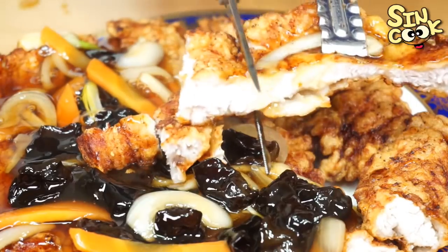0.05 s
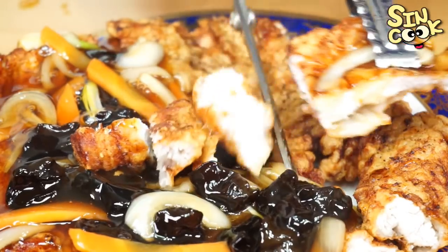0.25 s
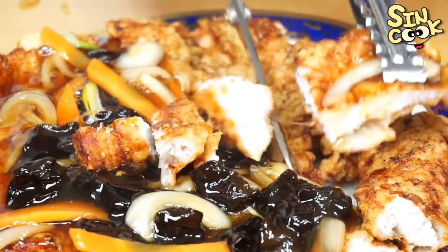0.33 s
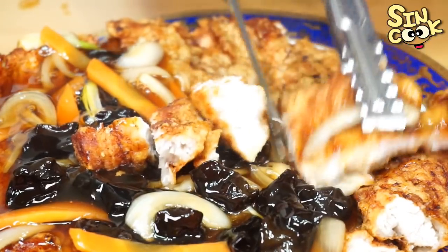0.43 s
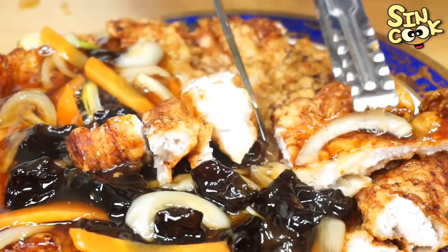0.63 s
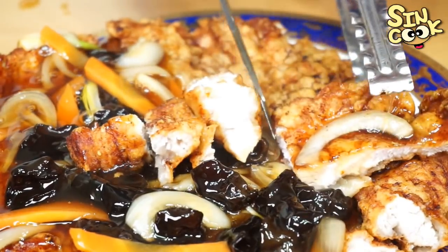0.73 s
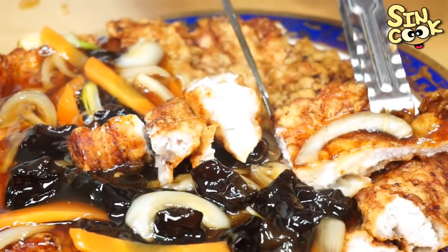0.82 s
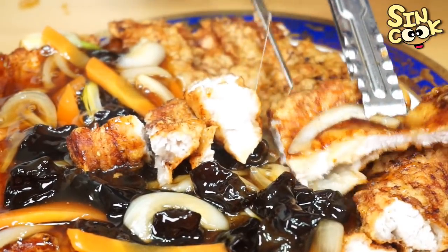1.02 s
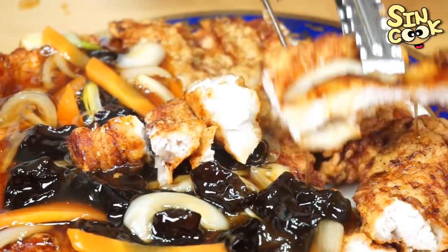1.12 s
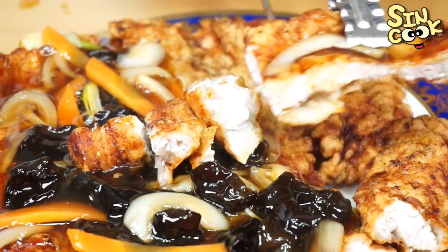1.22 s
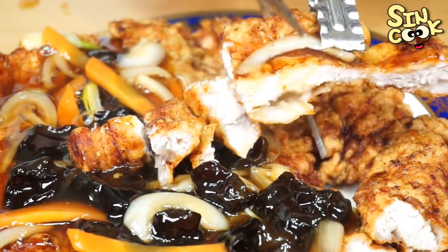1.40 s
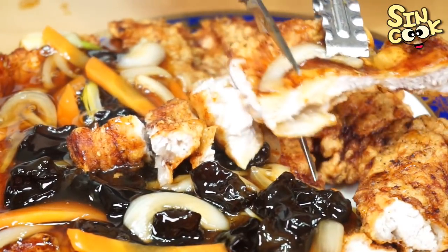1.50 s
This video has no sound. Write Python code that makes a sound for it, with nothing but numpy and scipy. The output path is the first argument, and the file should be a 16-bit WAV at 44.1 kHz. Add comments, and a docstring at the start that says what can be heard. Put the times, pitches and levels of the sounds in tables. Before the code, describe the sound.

Close up in a small room, scissors cut crispy, saucy fried meat, ending in one sharp metallic snip. Quieter crust crackles, a thin steel scrape and light clicks of tongs follow over faint ventilation.

```python
"""Kitchen scissors cut a crisp fried cutlet over a plate, close to a stereo microphone in a small room.
The crust crackles in tiny fractures, with wet pops of sauce, until the blades snap shut.
Tongs then press and pick up the meat, clicking, and steel rubs on steel with a thin ring.
Underneath lie the rush of ventilation, a faint hum and a low rumble of handling."""
import sys
import numpy as np
from scipy import signal
from scipy.fft import rfft, irfft
from scipy.io import wavfile
from scipy.ndimage import uniform_filter1d, minimum_filter1d

SR = 44100
rng = np.random.default_rng(int(sys.argv[2]) if len(sys.argv) > 2 else 0)


def unload_audio(sound):
    """Save the sound as a 16-bit wav file, at the path given as the first command line argument."""
    columns = np.transpose(np.atleast_2d(sound))
    # keep every value between -1 and 1, then stretch to whole-number steps
    steps = np.round(np.clip(columns, -1, 1) * 32767)
    wavfile.write(sys.argv[1], SR, steps.astype(np.int16))


N = 68355
TIME = np.arange(N) / SR

# crunch of the cut: t/s, dull body level/dB, crisp treble level/dB
CUT_LEVELS = [(0, -54.5, -52), (.03, -61, -64.5), (0.069, -58, -56.5), (.12, -57.5, -51.5),
              (.165, -56, -52), (.195, -50.5, -49.5), (.215, -47, -45), (0.254, -55.5, -45),
              (0.267, -44.5, -43), (.279, -41, -45), (.29, -87, -90)]
# crust squeezed or dragged: peak t/s, rise/s, fall/s, body level/dB, treble level/dB
CRUST_SQUEEZES = [(0.057, 0.0064, .016, -43, -56), (0.499, 0.056, 0.1, -55.5, -57.5),
                  (0.548, 0.032, 0.046, -48, -50), (.60, 0.046, 0.17, -58, -60),
                  (0.934, 0.048, 0.03, -55, -59.5), (0.958, 0.0075, 0.011, -49, -49),
                  (0.977, 0.011, 0.019, -48.5, -41.5), (1.024, 0.046, 0.033, -51.5, -49.5),
                  (1.09, 0.09, 0.072, -54, -51.5), (1.482, 0.019, 0.013, -59.5, -65.5),
                  (1.509, 0.0085, 0.063, -55.5, -49)]
# single cracks of crust and ticks of the tools: t/s, body level/dB, treble level/dB
CRACK_EVENTS = [(0.038, -68, -47), (0.055, -59, -41), (0.1064, -50, -62), (0.1342, -49.5, -46),
                (.139, -47.5, -44.5), (0.1751, -39.5, -44.5), (0.1815, -55, -67), (0.2002, -42, -37),
                (0.202, -51, -46), (0.2418, -77, -48), (0.577, -55, -50.5), (0.740, -52.5, -71),
                (0.944, -60, -52), (1.0988, -60, -40.5), (1.5047, -55, -48), (1.523, -58, -50),
                (1.541, -59, -51.5)]
# spectra of the crunch's dull body and crisp treble: f/Hz, level/dB
BODY_SPECTRUM = [(250, -29), (700, -11), (1100, -12), (1500, -5), (2000, -5), (2600, -2), (3200, -4),
                 (4200, -11.5), (6000, -21), (12000, -34)]
CRISP_SPECTRUM = [(2000, -39), (4200, -9.5), (5600, -10), (7400, -5), (8800, -2), (10400, -1), (12500, 1.5),
                  (14000, -2), (15700, -11.5)]
CRUNCH_PAN_DB, CRUNCH_WIDTH = -3, 0.44

# spectrum of the ventilation: f/Hz, level/dB
AIR_SPECTRUM = [(25, -22), (50, -11.5), (90, -8), (140, 0), (220, -1), (300, -3), (400, 0.5), (600, -2),
                (800, -5), (1300, -11.5), (1530, -5), (1800, -15), (4500, -19), (10000, -22),
                (15500, -25.5)]
# how alike the ventilation is in the two channels: f/Hz, correlation
AIR_LIKENESS = [(30, 0.76), (125, 0.92), (300, 0.58), (700, 0.33), (2000, 0.22), (12000, 0.2)]
# tones of the hum: f/Hz, level/dB
HUM_TONES = [(523.6, -63), (697.5, -73)]
# course of the handling rumble: t/s, level/dB
RUMBLE_LEVELS = [(0, -91), (.25, -64.5), (.45, -77.5), (.9, -78), (1.03, -57.5), (1.12, -67), (1.25, -60.5),
                 (1.55, -71.5)]
# its spectrum: f/Hz, level/dB
RUMBLE_SPECTRUM = [(20, -11.5), (50, -2.5), (90, -11.5), (220, 1.5), (400, -9.5), (3000, -61)]

# the blades shut and bounce twice: t/s, level/dB
BLADE_HITS = [(0.2796, 3), (.27989, -8.5), (0.2815, -11)]
# modes of the closing scissors: f/Hz, level/dB
SCISSOR_MODES = [(1150, -18), (2700, -13), (3420, -4.5), (3850, -10), (7450, -15), (8400, -12), (8950, -8),
                 (10150, -9.5), (11000, -10.5), (12300, -14), (15000, -20)]
# spectrum of the snap as it spreads into the room: f/Hz, level/dB
SNAP_ROOM_SPECTRUM = [(400, -23), (750, -15.5), (1050, -2), (1600, -6.5), (2400, 3), (3400, 0.5),
                      (5000, -9), (7000, -11.5), (10300, -7), (13000, -18), (15500, -13.5)]

# tongs drag through the crust: peak t/s, rise/s, fall/s, level/dB
TONG_DRAGS = [(0.545, 0.023, 0.026, -42.5), (1.094, 0.037, 0.039, -51)]
# tongs click against steel: t/s, level/dB
TONG_CLICKS = [(0.9725, -36), (1.0132, -29.5), (1.0185, -49)]
# modes of the gripped tongs: f/Hz, level/dB, T60/s
TONG_MODES = [(1970, -5, 0.0062), (2490, -0.5, 0.015), (2854, 1, 0.0079), (7020, 5, 0.0035),
              (10660, 3.5, 0.0066), (12030, 0, 0.0056), (13700, 4, 0.0034)]
# steel slides on steel: peak t/s, rise/s, fall/s, level/dB
STEEL_RUBS = [(0.688, 0.03, 0.022, -52), (0.71, .02, 0.026, -54), (0.732, 0.025, 0.034, -48),
              (0.79, 0.065, 0.033, -59), (0.869, 0.023, 0.054, -56), (0.901, 0.019, 0.01, -58)]
# modes of the sliding steel: f/Hz, level/dB, T60/s
STEEL_MODES = [(1870, -11, 0.28), (6880, -9, 0.025), (8710, -6.5, 0.027), (10190, 3.5, 0.03),
               (11500, -6, .032), (12540, -3, 0.032), (13100, -8, .032), (13650, -10, 0.032)]


def from_db(db):
    """Decibels to gain."""
    return 10 ** (np.asarray(db) / 20)


def rms_one(x):
    """Scale to unit power."""
    return x / np.sqrt(np.mean(x ** 2) + 1e-20)


def at_hz(points, hz):
    """Read a table on a log-frequency axis."""
    f, v = np.transpose(points)
    return np.interp(np.log(hz + 1e-6), np.log(f), v)


def pan(db):
    """Channel gains for a level difference, left minus right."""
    return from_db(np.array([[.5], [-.5]]) * db)


def decay(t60, size=N):
    """Gain that falls 60 dB in t60 seconds."""
    return from_db(-60 * TIME[:size] / t60)


def filtered(x, hz, kind="low", order=2):
    """Low-pass or high-pass a sound."""
    return signal.sosfilt(signal.butter(order, hz, kind, fs=SR, output="sos"), x)


def through(x, response):
    """Pass a sound through an impulse response."""
    return signal.fftconvolve(np.atleast_2d(x), np.atleast_2d(response), axes=1)[:, :N]


def colour(points, size=8192):
    """Causal impulse response of unit energy with the given spectral shape."""
    magnitude = from_db(at_hz(points, np.fft.rfftfreq(size, 1 / SR)))
    cepstrum = irfft(np.log(magnitude))
    cepstrum[1:size // 2] *= 2
    cepstrum[size // 2 + 1:] = 0
    response = irfft(np.exp(rfft(cepstrum)))
    return response / np.linalg.norm(response)


def ring(x, hz, t60):
    """One damped mode: a unit click sets a sine of height 1 ringing."""
    r, w = from_db(-60 / (t60 * SR)), 2 * np.pi * hz / SR
    return signal.lfilter([0, np.sin(w)], [1, -2 * r * np.cos(w), r * r], x + 1e-18)


def swells(rows):
    """Gain of swells added in power; each rise and fall time spans 20 dB."""
    return np.sqrt(sum(from_db(db - 20 * np.maximum((peak - TIME) / rise, (TIME - peak) / fall)) ** 2
                       for peak, rise, fall, db in rows))


def grains(per_s=4500, spread_db=5):
    """Tiny clicks of uneven size, each at its own place between left and right."""
    sizes = from_db(spread_db * np.minimum(rng.exponential(1, N), 4)) * rng.choice([-1, 1], N)
    clicks = sizes * (rng.random(N) < per_s / SR)
    return rms_one(clicks * (1 + CRUNCH_WIDTH * rng.standard_normal(N) * [[1], [-1]]))


def sauce_pops(per_s=54):
    """Sparse wet pops in the sauce, each a very short, high ring."""
    onsets = 1.0 * (rng.random(N + 1) < per_s / SR)
    return rms_one(np.diff(ring(onsets, hz=9300, t60=0.0029)))


def crunch():
    """Dense fractures of the crust, with wet pops, as loud as the blades and tongs press."""
    times, body_db, crisp_db = np.transpose(CUT_LEVELS)
    squeezes = np.array(CRUST_SQUEEZES)
    cutting = TIME < times[-1]
    body_gain = np.hypot(from_db(np.interp(TIME, times, body_db)) * cutting, swells(squeezes[:, :4]))
    crisp_cut = from_db(np.interp(TIME, times, crisp_db)) * cutting
    crisp_gain = np.hypot(crisp_cut, swells(squeezes[:, [0, 1, 2, 4]]))
    pops = from_db(-11) * sauce_pops() * crisp_gain
    body = through(grains() * body_gain, colour(BODY_SPECTRUM)) * pan(CRUNCH_PAN_DB)
    crisp = through(grains() * crisp_gain, colour(CRISP_SPECTRUM))
    return body + crisp + pops


def ventilation(level_db=-58.5):
    """Room tone: a steady rush of air, near the centre in the bass and wide in the treble."""
    hz = np.fft.rfftfreq(N, 1 / SR)
    mid, side = rfft(rng.standard_normal((2, N)))
    alike = np.clip(at_hz(AIR_LIKENESS, hz), 0, 1)
    stereo = np.sqrt(1 + alike) * mid + np.sqrt(1 - alike) * side * [[1], [-1]]
    return from_db(level_db) * rms_one(irfft(from_db(at_hz(AIR_SPECTRUM, hz)) * stereo, N))


def hum(waver=0.26, waver_hz=6):
    """Two faint tones in the room that waver in phase and level."""
    rolloff = 1 + (np.fft.rfftfreq(N, 1 / SR) / waver_hz) ** 2
    phase, flutter = waver * rms_one(irfft(rfft(rng.standard_normal((2, N))) / rolloff, N))
    tones = sum(from_db(db) * np.sqrt(2) * np.sin(2 * np.pi * hz * TIME + phase) for hz, db in HUM_TONES)
    return tones * (1 + flutter)


def handling_rumble():
    """Low noise that swells while the food is moved."""
    spectrum = from_db(at_hz(RUMBLE_SPECTRUM, np.fft.rfftfreq(N, 1 / SR)))
    noise = rms_one(irfft(rfft(rng.standard_normal(N)) * spectrum, N))
    return noise * from_db(np.interp(TIME, *np.transpose(RUMBLE_LEVELS)))


def cracks(t60=0.019, size=2048):
    """Each crack is a burst of fractures that dies within milliseconds."""
    out = np.zeros((2, N + size))
    body, crisp = colour(BODY_SPECTRUM), colour(CRISP_SPECTRUM)
    scale = np.sqrt(0.0042 * SR / size)   # as much energy as the listed level held for 4.2 ms
    for t, body_db, crisp_db in CRACK_EVENTS:
        mid, side = rng.standard_normal((2, size))
        burst = (mid + CRUNCH_WIDTH * side * [[1], [-1]]) * decay(t60, size)
        start = int(t * SR)
        for response, gain in ((body, from_db(body_db) * pan(CRUNCH_PAN_DB)), (crisp, from_db(crisp_db))):
            out[:, start:start + size] += scale * gain * rms_one(through(burst, response)[:, :size])
    return out[:, :N]


def scissor_snap(nearby, walls, t60=0.0059, room_db=1.5):
    """The blades hit their stop and bounce; the hand damps them at once and the room answers."""
    hits, blades = np.zeros(N), np.zeros((2, N))
    for t, db in BLADE_HITS:
        hits[int(t * SR)] += from_db(db)
    main_hz = SCISSOR_MODES[2][0]
    for k, (hz, db) in enumerate(SCISSOR_MODES):
        pan_db = -0.5 - 2 * abs(np.log2(hz / main_hz))   # modes far from the main one sit further right
        blades += (-1) ** k * from_db(db) * ring(hits, hz, t60) * pan(pan_db)
    direct = filtered(blades, 1100, "high", order=4)   # the snap carries no bass
    first_hit = signal.unit_impulse(N, int(BLADE_HITS[0][0] * SR))
    spread = through(first_hit, colour(SNAP_ROOM_SPECTRUM))
    return through(direct, nearby) + from_db(room_db) * through(spread, walls)


def tongs(chatter_db=-1, tick_db=-2):
    """Dragging through crust rings the tongs' modes; so does each click, a strike with a brief chatter."""
    impulse, strikes = signal.unit_impulse(N), np.zeros(N)
    for t, db in TONG_CLICKS:
        start = int(t * SR)
        chatter = rng.standard_normal(N) * decay(t60=0.0067)
        force = impulse + from_db(chatter_db) * chatter / np.linalg.norm(chatter)
        strikes[start:] += from_db(db) * force[:N - start]
    modes = sum((-1) ** k * from_db(db) * ring(impulse, hz, t60)
                for k, (hz, db, t60) in enumerate(TONG_MODES))
    cushioned = filtered(modes, hz=3420)   # the meat softens the contact
    drag = through(grains() * swells(TONG_DRAGS), cushioned / np.linalg.norm(cushioned))
    return from_db(tick_db) * strikes + through(strikes, modes) + drag * pan(CRUNCH_PAN_DB)


def steel_rub(ring_db=-5, hiss_db=-7, body_db=-6.5, bend_share=0.005):
    """Sliding steel catches on tiny ridges, which hiss and set its modes ringing."""
    force = swells(STEEL_RUBS)
    slips = grains() * force
    rings = sum(from_db(db) * rms_one(ring(slips, hz, t60)) for hz, db, t60 in STEEL_MODES)
    rings *= np.sqrt(np.mean(force ** 2))
    # the moving contact bends the pitch of the ring
    bend = bend_share * rms_one(filtered(rng.standard_normal(N), hz=24.25))
    bent_time = TIME + np.cumsum(bend) / SR
    rings = np.array([np.interp(bent_time, TIME, channel) for channel in rings])
    hiss = from_db(hiss_db) * through(slips, colour(CRISP_SPECTRUM))
    body = from_db(body_db) * through(slips, colour(BODY_SPECTRUM))
    return from_db(ring_db) * rings + hiss + body


def plate(scatter_db=-4.5, t60=0.0045, size=2048):
    """Response of plate and table: the direct sound, then a quick scatter, different in each channel."""
    scatter = rms_one(rng.standard_normal((2, size)) * decay(t60, size)) / np.sqrt(size)
    return signal.unit_impulse(size) + from_db(scatter_db) * scatter


def room(t60=0.23, treble_t60=0.21, split_hz=6000, gap_s=0.0023):
    """Response of the small room at the microphone: a diffuse stereo tail whose treble dies first."""
    noise = rng.standard_normal((2, N))
    low = filtered(noise, split_hz) * decay(t60)
    high = filtered(noise, split_hz, "high") * decay(treble_t60)
    tail = (low - high) * (TIME > gap_s)
    return rms_one(tail + 0.21 * tail[::-1]) / np.sqrt(N)   # each channel hears a little of the other


def scene():
    """Food and tools close to the microphone, the plate under them, the room around them."""
    nearby, walls = plate(), room()
    close = crunch() + cracks() + steel_rub() + tongs()
    reverb = from_db(-11) * through(close, walls)
    return close + reverb + scissor_snap(nearby, walls) + ventilation() + handling_rumble() + hum()


def record(dry, limit_db=-3, release_db_per_s=93, cutoff_hz=15850):
    """The recorder's limiter ducks on the loudest peak and recovers; a steep filter cuts the top."""
    over_db = np.maximum(20 * np.log10(np.abs(dry).max(axis=0) + 1e-9) - limit_db, 0)
    release_db = release_db_per_s * TIME
    duck_db = np.maximum.accumulate(over_db + release_db) - release_db
    gain = uniform_filter1d(minimum_filter1d(from_db(-duck_db), size=64), size=64)
    return signal.sosfilt(signal.ellip(12, .1, 80, cutoff_hz, fs=SR, output="sos"), dry * gain)


dry = scene()
out = record(dry)
unload_audio(out)
```